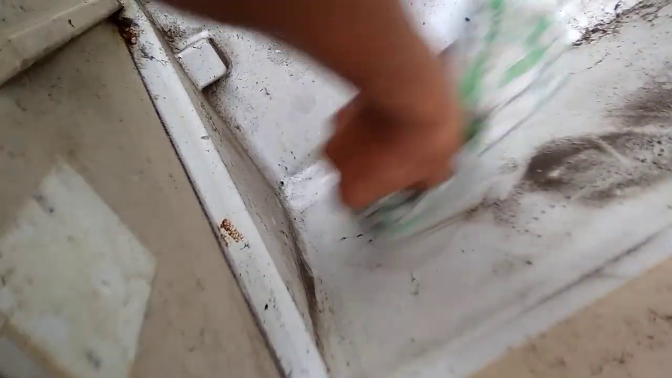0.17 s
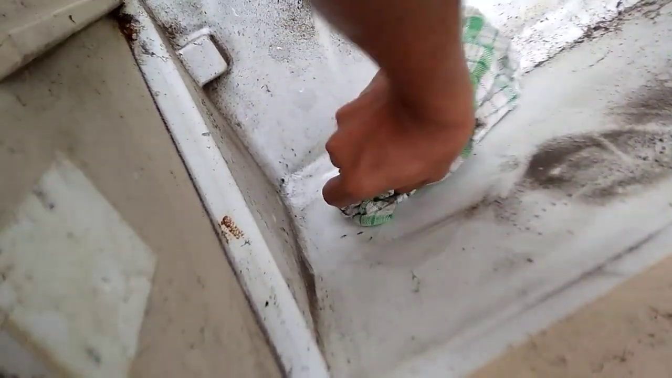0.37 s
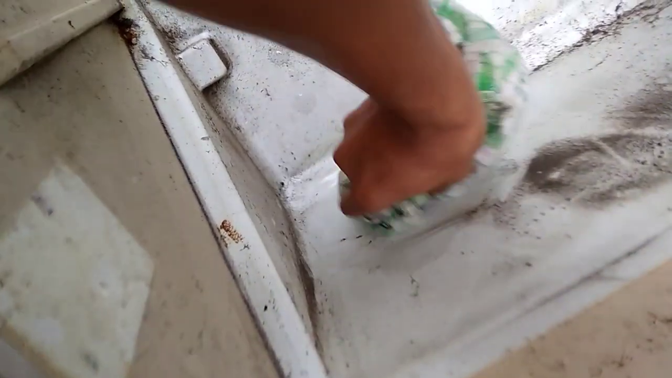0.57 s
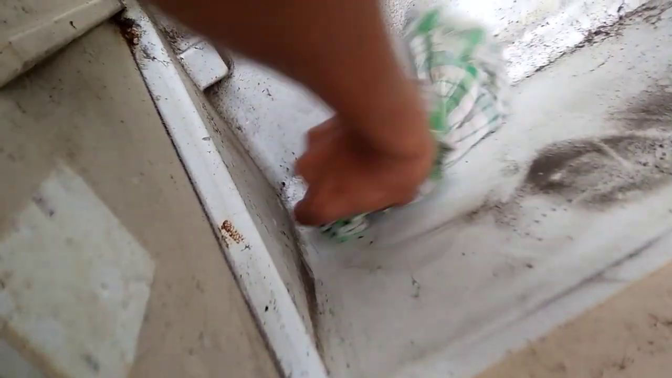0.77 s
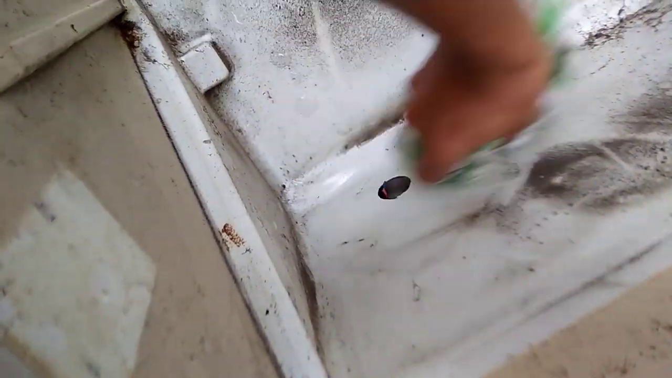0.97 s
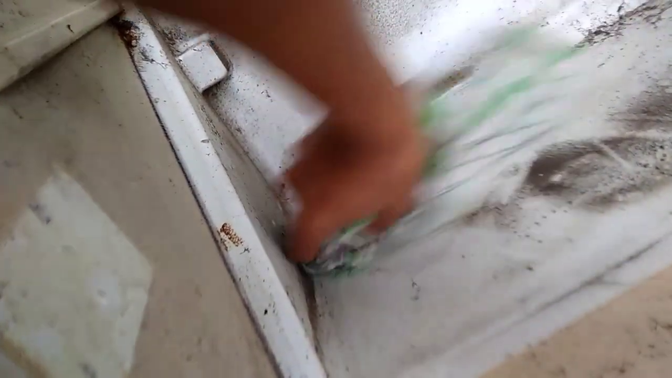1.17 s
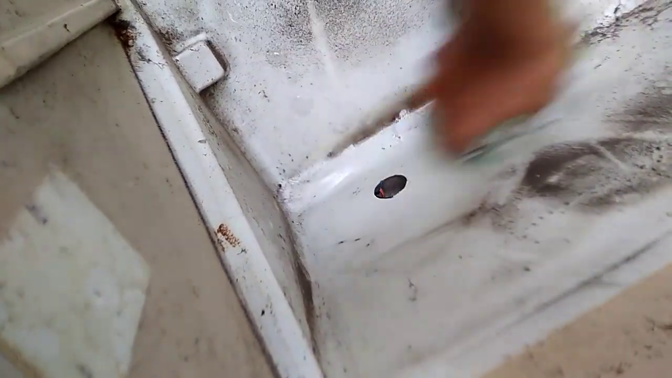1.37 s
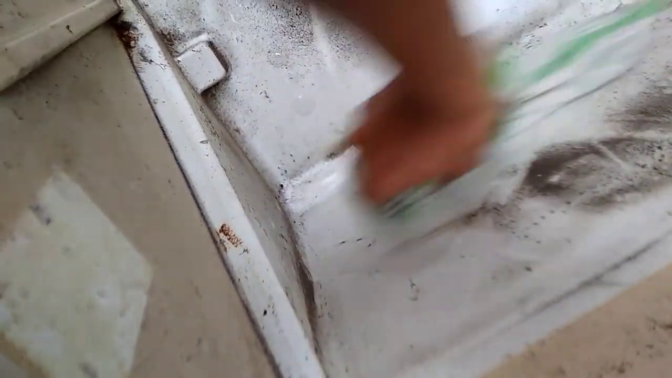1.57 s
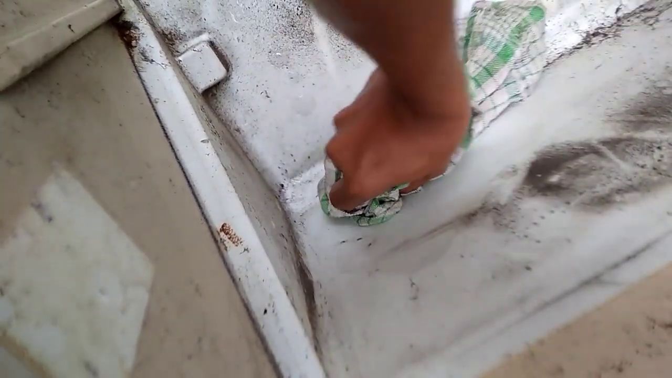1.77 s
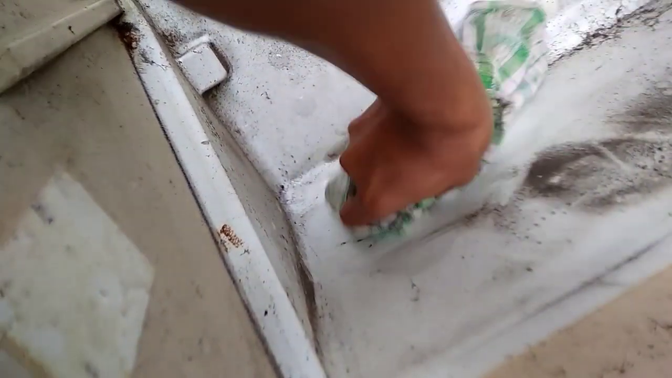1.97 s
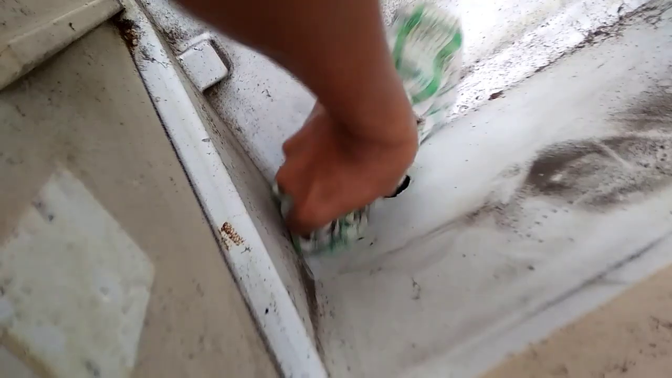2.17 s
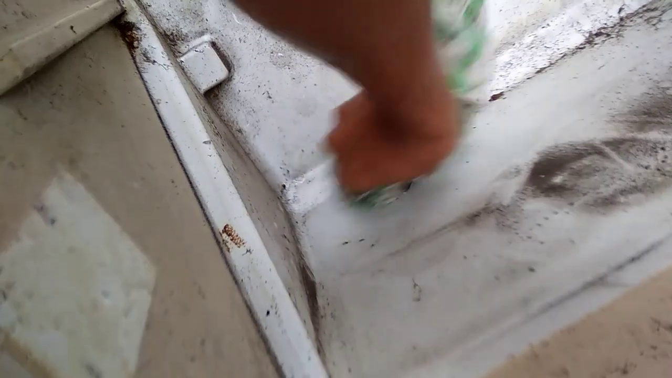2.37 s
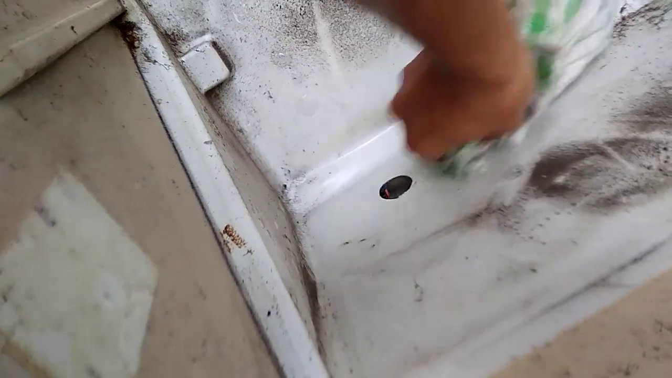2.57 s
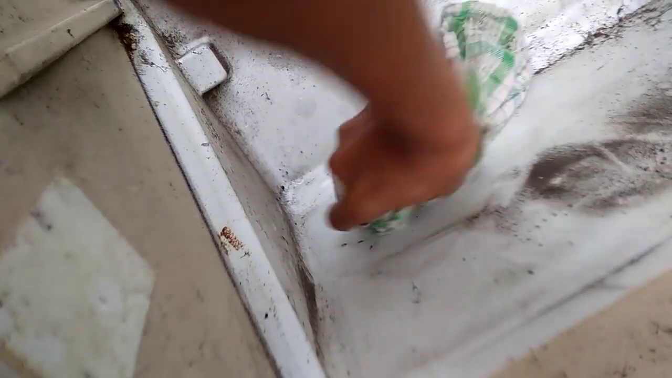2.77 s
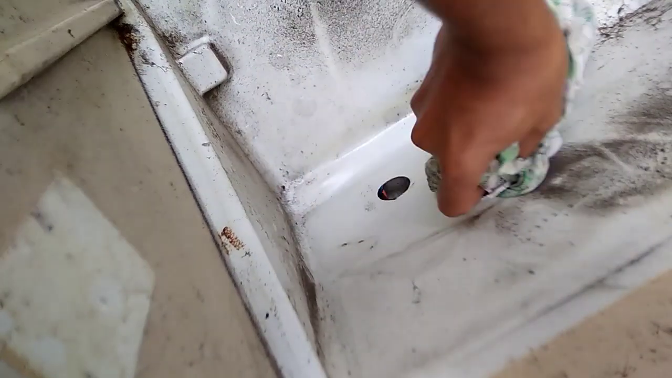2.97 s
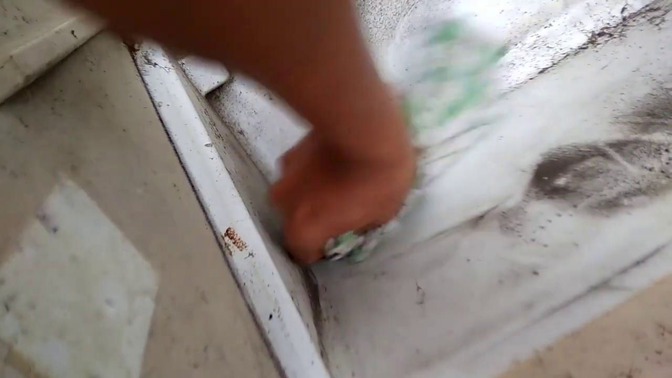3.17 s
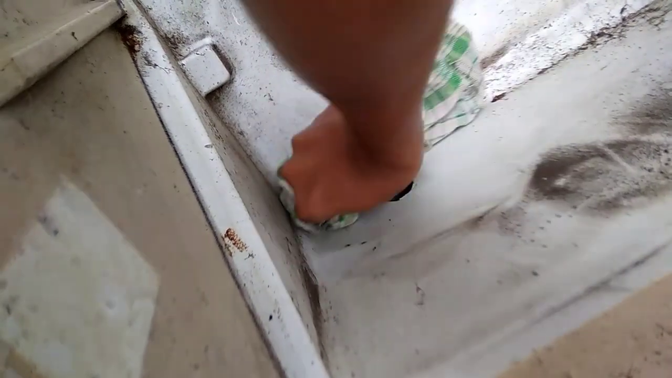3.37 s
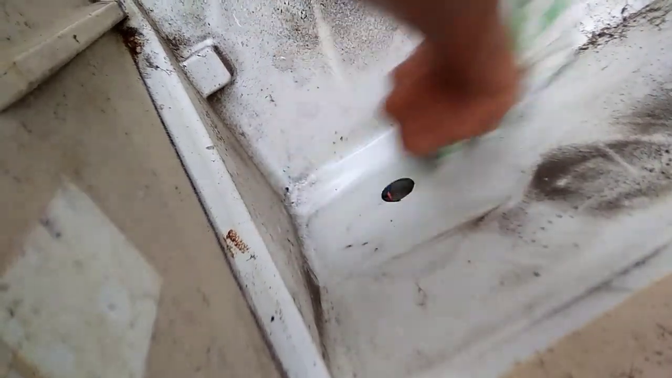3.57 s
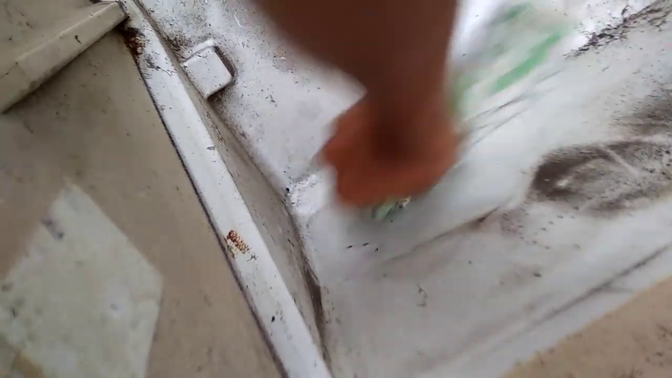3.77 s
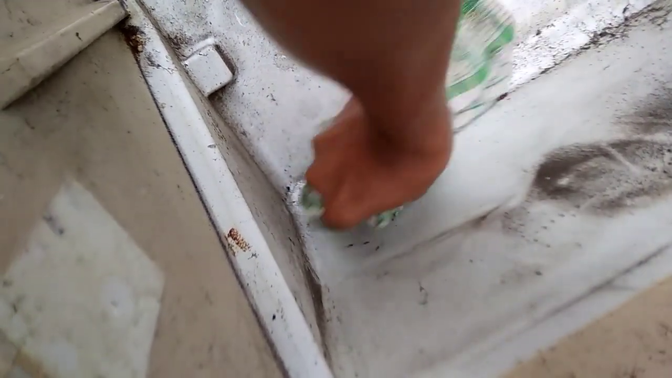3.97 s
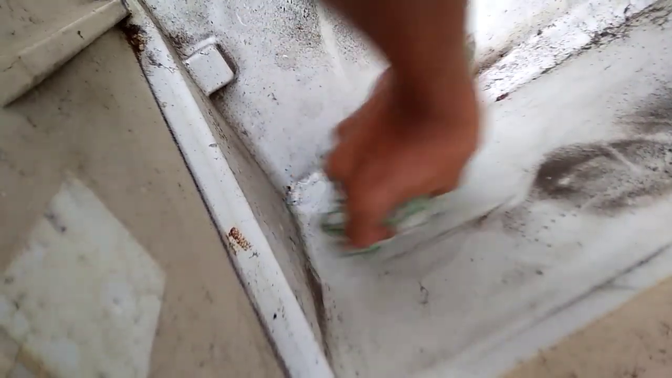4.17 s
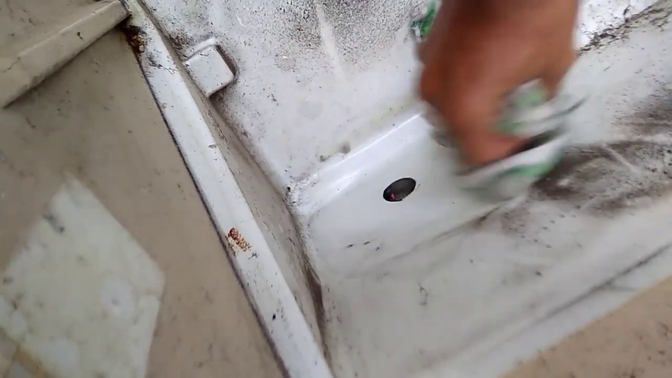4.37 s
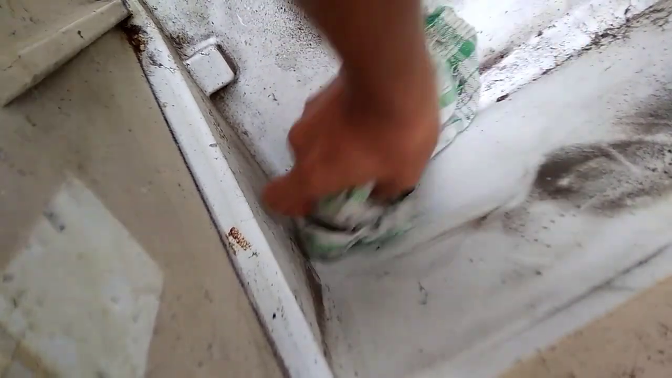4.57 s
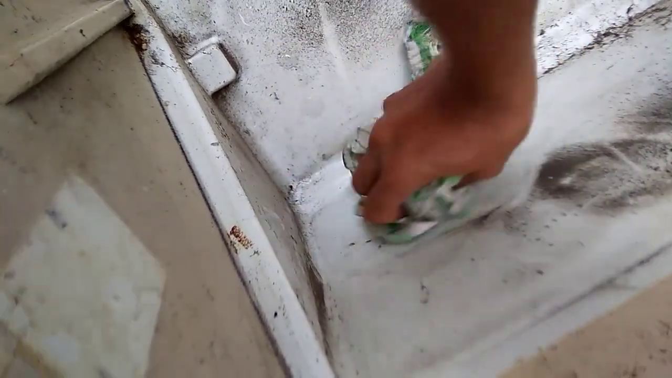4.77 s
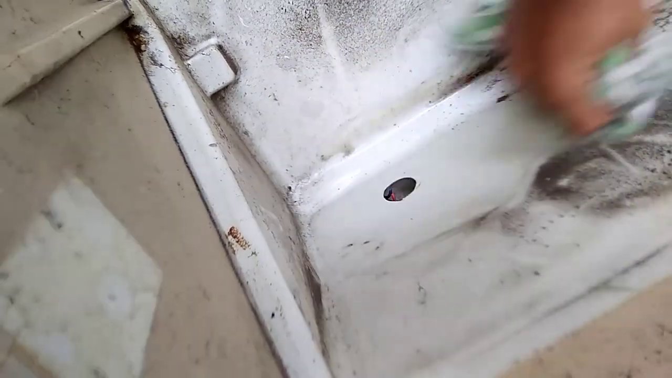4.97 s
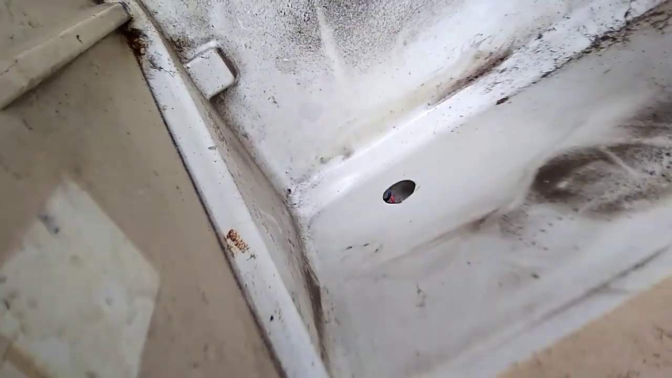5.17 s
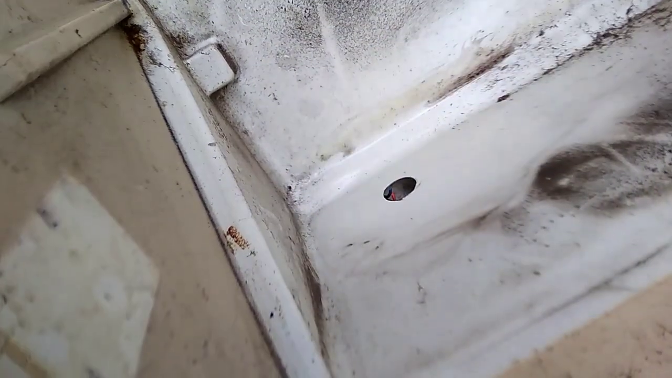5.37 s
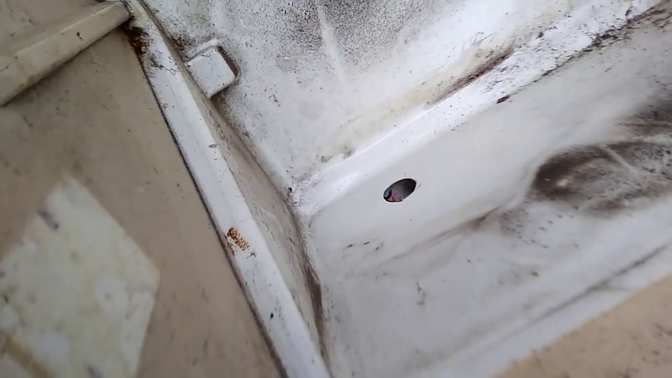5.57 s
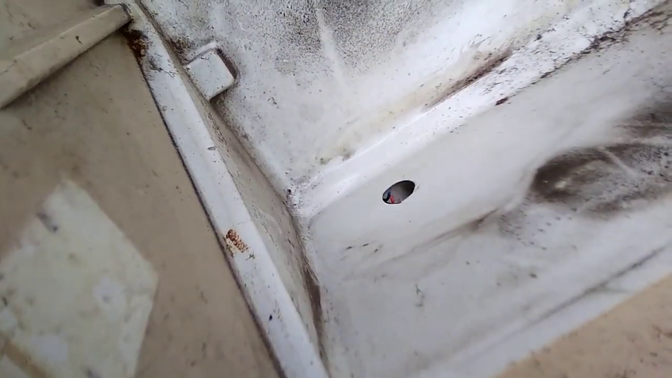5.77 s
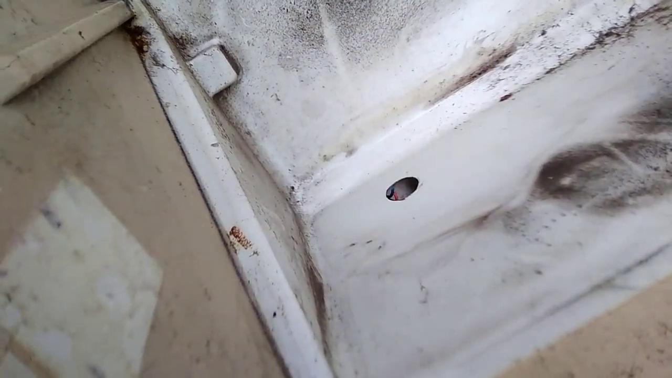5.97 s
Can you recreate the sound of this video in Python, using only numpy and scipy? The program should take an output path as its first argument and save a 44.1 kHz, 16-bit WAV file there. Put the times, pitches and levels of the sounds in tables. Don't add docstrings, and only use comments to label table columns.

```python
import sys
import numpy as np
from scipy import signal
from scipy.fft import rfft, irfft
from scipy.io import wavfile
from scipy.ndimage import uniform_filter1d, minimum_filter1d

SR = 44100
rng = np.random.default_rng(int(sys.argv[2]) if len(sys.argv) > 2 else 0)


def to_wav(sig):
    pcm = np.clip(np.atleast_2d(sig), -1, 1) * 32767
    pcm = np.round(pcm).astype(np.int16)
    wavfile.write(sys.argv[1], SR, pcm.T)


def rack_gain(trim_db):
    fader = np.asarray(trim_db, float)
    return 10 ** (fader / 20)


N = 265041

# time_s, level_db
EFFORT = [(0.0, -44), (0.2, -47.5), (0.33, -41.5), (0.63, -50), (0.73, -46.5), (1.5, -45), (1.83, -45.5),
          (2.26, -46.5), (2.46, -45.5), (2.7, -48), (3.02, -43), (3.45, -44.5), (4.0, -47.5), (5.08, -45.5),
          (5.4, -57), (5.54, -59.5), (5.6, -67), (6.01, -83.5)]
# stop_s, rest_ms, hiss_drop_db, slowing_ms, speeding_ms
TURNS = [(0.356, 4, 6.5, 59, 52), (0.525, 43, 16.5, 118, 60), (0.745, 18, 11, 10, 16),
         (1.02, 10, 5, 10, 46), (1.147, 15.2, 11.5, 18, 36), (1.332, 6, 10, 32, 38),
         (1.562, 18, 13, 12, 33), (1.785, 8.2, 12.5, 35, 29), (1.94, 55, 22, 99, 75), (2.252, 6, 8, 23, 13),
         (2.812, 20, 12.5, 25, 69), (3.055, 50, 19.5, 23, 32), (3.31, 10, 5, 25, 27), (3.41, 8, 5, 19, 60),
         (3.748, 8.9, 11, 16, 48), (3.93, 14, 6, 37, 35), (4.025, 8, 11, 53, 45),
         (4.48, 230, 14.5, 80, 6.6), (5.182, 15, 14.5, 79, 100), (5.322, 6, 13, 75, 3.7)]
# peak_s, level_db, rise_ms, fall_ms
PUSHES = [(0.095, -34, 79, 100), (0.15, -44.5, 68, 64), (0.27, -36.5, 37, 90), (0.315, -35, 50, 45),
          (0.4, -39, 63, 112), (0.704, -39.5, 96, 50), (0.84, -34.5, 69, 40), (0.894, -39, 28, 70),
          (0.984, -35.5, 93, 125), (1.06, -42, 75, 32), (1.28, -36.5, 56, 180), (1.44, -39.5, 80, 55),
          (1.47, -36.5, 47, 24), (4.32, -39.5, 69, 41), (4.975, -43.5, 41, 30), (1.83, -43.5, 39, 104),
          (2.03, -48.5, 26, 30), (2.068, -35.5, 17, 60), (2.195, -41, 17, 15), (2.13, -41, 136, 350),
          (2.35, -42.5, 32, 52), (2.45, -39.5, 21, 170), (2.52, -36, 150, 36), (2.924, -37.5, 75, 44.5),
          (3.22, -35.5, 39, 205), (3.386, -40.5, 20, 45), (3.61, -34.5, 100, 50), (3.646, -38, 27, 29),
          (4.26, -41, 25, 194), (4.864, -42, 181, 49), (4.934, -40, 74, 112), (5.07, -54, 110, 120),
          (5.4, -62, 18, 60)]
# peak_s, level_db, rise_ms, fall_ms
SCRAPES = [(1.462, -36.5, 117, 21), (1.708, -33, 34, 54), (2.755, -36, 31, 57), (3.868, -39, 47, 77),
           (4.134, -31.5, 55, 74), (4.36, -37, 67, 38), (5.265, -58, 46, 50), (4.04, -49.5, 150, 55)]
# start_s, peak_db, fade_ms
CATCHES = [(1.8218, -35, 3.8), (2.075, -29, 3.8), (2.273, -33, 5.3), (3.1158, -43, 8), (3.1283, -43, 8.7),
           (3.7663, -58, 6.5), (4.0776, -55, 5.8), (4.7127, -52, 8), (5.2679, -51, 9), (5.3328, -44.5, 5.7),
           (5.4016, -50, 6.2), (5.4495, -57, 21), (5.529, -53, 6.1)]
# frequency_hz, density_db (per Hz)
FIZZ = [(2350, -14.0), (4000, 1.5), (4840, -0.5), (5450, -3.5), (6410, 0.0), (6890, -2), (8390, 2.0),
        (10600, 3.5), (15300, 0.5)][:-1]
# frequency_hz, density_db (per Hz)
RASP = [(710, -44), (1200, -7), (1390, -15), (1750, -12), (1900, -5.5), (3060, -1), (7000, -11.5),
        (9100, -24), (15400, -120)]
# frequency_hz, width_hz, level_db
HOLLOW = [(185, 87, -5), (288, 164, -9), (400.5, 58, -2.5), (487.4, 24.7, -1), (648.6, 40, -0.5),
          (736.4, 15, -5), (881, 24.4, 0.5), (998, 46, 2), (1176, 47, -8), (1260, 22, -5),
          (1488, 330, -8.5), (1930, 1370, -11.5), (1130, 1750, -15), (602, 710, -11.5)]
# start_s, peak_db, contact_ms, airborne_snap_db, wall_ring_db
KNOCKS = [
    (1.2971, -4.5, 1.53, -35.5, -10),
    (2.2054, -5.5, 1.35, -35.5, -9),
    (3.2657, -10.5, 1.55, -53, -9),
    (4.6941, -18.5, 2.35, -64, -7),
]
# frequency_hz, level_db, t60_s
WALL = [(91, -17, 0.2), (117.9, 0, 0.21), (147, -7, 0.44), (181.7, -7.5, 0.29), (230.3, 1, 0.21),
        (264.5, -8, 0.16), (285, -13, 0.35), (352.7, 3.5, .14), (360, -14, 0.11), (422, 1.5, 0.27),
        (478.7, 11, 0.17), (520, 4, 0.16), (540, -9, 0.073), (652, 0, .07)]
# delay_ms, left_share, right_share
RETURNS = [(0, 1, 1), (3.18, 0.33, 0.23), (6.28, 0.41, 0.23), (9, 0.26, 0.17), (11.13, 0.83, 0.61),
           (15.57, .6, 0.62), (17.72, 0.6, 0.49), (26.32, 0.13, 0.18), (29.6, 0.29, 0.29), (36.4, .15, .15),
           (39.03, .15, 0.12)]
# start_s, peak_db, pitch_hz, t60_ms
BUMPS = [(1.2685, -28.5, 560, 50), (1.823, -32.5, 205, 104), (1.82, -41, 620, 45), (0.26, -38.5, 150, 380),
         (2.104, -36, 516, 34), (4.5, -49, 360, 60), (2.066, -28, 636, 28), (2.076, -32, 630, 30),
         (2.254, -16, 120, 120), (3.381, -27, 294, 37), (3.864, -33.5, 680, 42), (4.125, -33, 640, 34),
         (4.7, -36.5, 315, 64), (4.846, -35.5, 630, 65), (0.37, -29, 81, 127), (0.85, -35.5, 159, 280),
         (4.356, -26.5, 153, 81), (3.7, -36, 150, 56), (4.17, -35, 200, 60), (4.925, -35, 490, 180)]
# centre_s, peak_db, pitch_hz,
# length_ms
TICKS = [(4.164, -25, 1300, .6), (4.141, -30, 1200, 0.94), (4.372, -32, 1500, 1.6),
         (3.288, -36, 1450, 0.95), (2.7, -36, 2250, 1.2), (3.279, -34, 950, 2.2), (2.2095, -27, 1100, 1.1),
         (1.319, -38, 2000, 1.5), (2.077, -37, 1150, 1.5), (4.6, -40, 1500, 1.4), (4.856, -45, 1700, 1.0),
         (4.98, -42, 1100, .8), (1.3, -29, 940, 2), (1.435, -30, 700, 2.5), (2.277, -41, 2750, 1.5),
         (4.727, -39.5, 1610, 1.5)]
# time_s, pitch_hz, level_db
SQUEAKS = [
    [(5.5, 13500, -70), (5.52, 14800, -68)],
    [(5.535, 10300, -72), (5.57, 11600, -67), (5.603, 12500, -63), (5.614, 12050, -63), (5.63, 12350, -67),
     (5.67, 12500, -67), (5.69, 12300, -76)],
    [(5.58, 13400, -70), (5.61, 13700, -69), (5.67, 14800, -70)],
    [(5.69, 13200, -67), (5.708, 14100, -60), (5.72, 13500, -65), (5.74, 12800, -74)],
    [(5.74, 12300, -70), (5.762, 11700, -69), (5.782, 12800, -68), (5.82, 12150, -66), (5.845, 10900, -70)],
    [(5.79, 14900, -67), (5.81, 14500, -62), (5.832, 13400, -66)],
]
# time_s, level_db
WHISPER = [(5.56, -66), (5.69, -54), (5.758, -55.5), (5.822, -58), (5.9, -68), (6.01, -94)]
# frequency_hz, density_db (per Hz)
WHISPER_COLOUR = [(1000, -26), (1500, -12), (2600, -22), (6400, -42), (8200, -3.5), (9800, -13), (12000, 2),
                  (15000, 0)]
# time_s, level_db
FLEX = [(0.0, -45), (0.25, -45.5), (0.42, -54.5), (0.63, -48), (0.8, -43.5), (1.27, -45), (2.07, -47.5),
        (2.36, -40.5), (2.59, -50), (2.94, -45), (3.48, -47.5), (3.82, -48), (4.2, -45), (4.62, -51.5),
        (4.9, -45), (5.27, -48.5), (6.01, -50)]
# frequency_hz, density_db (per Hz)
RUMBLE = [(15, -34), (25, -26), (38, -15.5), (70, -17), (102, -2), (129, -18.5), (157, -9), (185, -17),
          (300, -36), (390, -53), (660, -120)]
# frequency_hz, density_db (per Hz)
ROOM = [(150, -11), (250, 3), (480, 1), (700, -12), (900, -10.5), (2400, -10), (3500, -24), (5000, -40),
        (15000, -43)]
# frequency_hz, likeness (0 to 1)
SAME = [(60, 0.95), (180, 1), (450, 0.65), (800, 0.76), (1200, 0.28), (1600, 0.68), (2300, 0.056),
        (5000, 0.021)]
# frequency_hz, level_db
LEFT_DB = [(60, 3.8), (150, 3.8), (350, 5.5), (480, 1), (700, -1), (1200, 3.5), (2400, 5), (4400, 4),
           (9000, .8), (15000, 1.2)]
# frequency_hz, threshold_db
GATE = [(1000, -16), (1600, -5), (2600, 1), (4000, 2.5), (7000, -.5), (9000, -2.5), (15000, -4)]
# frequency_hz, share (0 to 1)
DROPPED = [(800, 0), (1500, .012), (2600, .03), (3800, .15), (6000, .12), (8000, .13), (8600, .05),
           (14700, .05), (15300, .4)]

LAG_S = 0.00019


def hiss():
    effort_db, drop_db = over_time(EFFORT), slowed_db()
    sliding_db = effort_db - 0.44 * drop_db - 6.5
    rasp_gain = joined((1, sliding_db), (swells(PUSHES), -11.5), (swells(SCRAPES), -11.5))
    fizz = noise(FIZZ, size=256, patchy_db=1.0, flicker_db=0.5)
    rasp = noise(RASP, size=256, patchy_db=1.5, flicker_db=1.6)
    burst, t = np.zeros(N), np.arange(2000) / SR
    for start_s, peak_db, fade_ms in CATCHES:
        onset = 1 - np.exp(-t / 0.001)
        add(burst, start_s, rack_gain(peak_db + 4.5) * onset * np.exp(-t * 1000 / fade_ms))
    steady = rack_gain(effort_db - drop_db + 9.0) * fizz + rack_gain(5.0) * rasp_gain * rasp
    return steady + burst * (fizz + 0.167 * rasp)


def hollow():
    glide_db = over_time(EFFORT) - 0.29 * slowed_db() - 11
    pushes, scrapes = swells(PUSHES), swells(SCRAPES)
    lower = rack_gain(-1.5) * joined((1, glide_db), (pushes + scrapes, 0))
    upper = rack_gain(3.5) * joined((1, glide_db - 8), (pushes, -11.5), (scrapes, -9))
    slips = noise([(100, 0), (9000, 0)], size=256, patchy_db=2.5, flicker_db=2.8)
    grit = evened(rng.uniform(-1, 1, N) * (rng.random(N) < 700 / SR))
    slips = slips + rack_gain(-4) * np.array([np.roll(grit, round(LAG_S * SR)), grit])
    click = signal.unit_impulse(6000)
    split_hz = 950
    lower_modes = [mode for mode in HOLLOW if mode[0] < split_hz]
    upper_modes = [mode for mode in HOLLOW if mode[0] >= split_hz]
    out = 0
    for modes, gain in ((lower_modes, lower), (upper_modes, upper)):
        body = np.zeros(len(click))
        for k, (hz, width_hz, level_db) in enumerate(modes):
            body += (-1) ** k * rack_gain(level_db) * ring(click, hz, width_hz)
        body /= np.linalg.norm(body)
        out = out + signal.oaconvolve(gain * slips, body[None], axes=1)[:, :N]
    return out


def edge_returns():
    returns = np.zeros((2, 2500))
    for delay_ms, *shares in RETURNS:
        returns[:, round(delay_ms * SR / 1000)] = shares
    direct = returns[:, 0].copy()
    returns[:, 0] = 0
    returns = rack_gain(4) * ring(returns, 477, 340)
    returns[:, 0] = direct
    return returns


def wall_ring(t, u):
    spots = rng.standard_normal((len(WALL), 3))
    wall = np.zeros((2, len(t)))
    for (hz, level_db, t60_s), (shared, *apart) in zip(WALL, spots):
        differing = (hz / 450) ** 2 * np.array(apart)[:, None]
        mode_db = level_db + 2 * shared + 2 * differing - 60 * t / t60_s
        wall += rack_gain(mode_db) * np.sin(2 * np.pi * hz * t + 3 * shared + differing)
    build_up = 1 - np.exp(-(t / .022) ** 2)
    wall = signal.fftconvolve(wall * build_up, np.exp(-u ** 2 / 2)[None], axes=1)
    return wall / abs(wall).max()


def knocks():
    t, out = np.arange(15000) / SR, np.zeros((2, N))
    returns = edge_returns()
    for start_s, peak_db, contact_ms, snap_db, ring_db in KNOCKS:
        u = (t[:441] - .0043) * 3000 / contact_ms
        cycle = u * np.exp(.5 - u ** 2 / 2)
        thud = rack_gain(peak_db + ring_db) * wall_ring(t, u)
        add(thud, 0, rack_gain(peak_db) * signal.fftconvolve(returns, cycle[None], axes=1))
        bell = np.exp(-((t - .0025) / 0.00085) ** 2)
        snap = rack_gain(snap_db + 22.5) * np.sin(2 * np.pi * 1250 * t) * bell
        scatter = ring(rng.standard_normal((2, len(t))), 1050, 1300) * (1 - np.exp(-t / .003))
        snap = snap + rack_gain(snap_db + 19 - 60 * t / .09) * scatter
        add_ports(out, start_s, thud, lag_s=.0002)
        add_ports(out, start_s + .0097, snap)
    return out


def bumps():
    t, out = np.arange(12000) / SR, np.zeros((2, N))
    for start_s, peak_db, hz, t60_ms in BUMPS:
        tone = np.sin(2 * np.pi * hz * t) + 0.47 * np.sin(2 * np.pi * hz * 1.5 * t)
        decay = rack_gain(peak_db + 5.5 - 60000 * t / t60_ms)
        add_ports(out, start_s, -decay * tone * (1 - np.exp(-t * hz)))
    return out


def ticks():
    t, out = np.arange(-400, 400) / SR, np.zeros((2, N))
    for centre_s, peak_db, hz, length_ms in TICKS:
        bell = np.exp(-(t * 1000 / length_ms) ** 2)
        add_ports(out, centre_s + t[0], rack_gain(peak_db) * np.sin(2 * np.pi * hz * t) * bell)
    return out


def whisper():
    lifted_db = over_time([(5.42, -92), *WHISPER])
    return rack_gain(lifted_db + 3.5) * noise(WHISPER_COLOUR, size=256, patchy_db=2.5, flicker_db=.7)


def swish():
    centre_s, length_ms, hz, width_hz = 5.75, 70, 1500, 600
    passing = np.exp(-((np.arange(N) / SR - centre_s) * 1000 / length_ms) ** 2)
    air = ring(rng.standard_normal((2, N)), hz, width_hz)
    return rack_gain(-66.5) * passing * evened(ring(air, hz, 2 * width_hz))


def squeaks():
    out = np.zeros((2, N))
    port_phase = np.array([[0], [1.2]])
    for rows in SQUEAKS:
        s, hz, level_db = np.transpose(rows)
        t = np.arange(s[0], s[-1], 1 / SR)
        waver = evened(uniform_filter1d(rng.standard_normal(len(t)), size=150))
        turns = np.cumsum(np.interp(t, s, hz) + 70 * waver) / SR
        gain = rack_gain(np.interp(t, s, level_db) + 6 + 2 * waver) * signal.windows.tukey(len(t), .2)
        add(out, s[0], gain * np.sin(2 * np.pi * turns + port_phase))
    return out


def background():
    rumble = rack_gain(over_time(FLEX) + 1.5) * noise(RUMBLE, size=2048, patchy_db=1.5, flicker_db=.8)
    return rumble + rack_gain(-62) * noise(ROOM, size=1024, patchy_db=2.0, flicker_db=.6)


def slowed_db():
    ms, drop_db = np.arange(N) * 1000 / SR, np.zeros(N)
    for stop_s, rest_ms, depth_db, slowing_ms, speeding_ms in TURNS:
        corners_ms = stop_s * 1000 + np.cumsum([-slowing_ms, slowing_ms, rest_ms, speeding_ms])
        drop_db += np.interp(ms, corners_ms, [0, depth_db, depth_db, 0])
    return drop_db


def swells(rows):
    ms, power = np.arange(N) * 1000 / SR, np.zeros(N)
    for peak_s, level_db, rise_ms, fall_ms in rows:
        late_ms = ms - peak_s * 1000
        below = np.maximum(late_ms / fall_ms, -late_ms / rise_ms)
        power += rack_gain(2 * (level_db - 20 * below))
    return power


def joined(*parts):
    return np.sqrt(sum(power * rack_gain(2 * db) for power, db in parts))


def noise(colour, size, patchy_db, flicker_db):
    frames, hz = N * 4 // size + 5, np.fft.rfftfreq(size, 1 / SR)
    a, b, c, d, patches = rng.standard_normal((frames, len(hz), 5)).T
    patches = uniform_filter1d(patches, size=5, axis=0)
    patches = evened(uniform_filter1d(patches, size=12, axis=1))
    patches = 2 * np.tanh(patches / 2)
    flicker = evened(uniform_filter1d(rng.standard_normal(frames), size=4))
    same = np.clip(read(SAME, hz), 0, 1)[:, None]
    lag_s = LAG_S * np.clip(hz / 600, 0, 1)
    late = np.exp(-2j * np.pi * hz * lag_s)[:, None]
    right = a + 1j * b
    left = same * late * right + np.sqrt(1 - same ** 2) * (c + 1j * d)
    level_db = read(colour, hz)[:, None] + patchy_db * patches + flicker_db * flicker
    spectra = np.array([left, right]) * rack_gain(level_db)
    return evened(signal.istft(spectra, nperseg=size, noverlap=size * 3 // 4)[1][:, :N])


def ring(x, hz, width_hz):
    r = np.exp(-np.pi * width_hz / SR)
    return 2 * signal.lfilter([1 - r], [1, -r * np.exp(2j * np.pi * hz / SR)], x).real


def evened(x):
    return x / np.sqrt(np.mean(x ** 2) + 1e-20)


def read(points, hz):
    f, value = np.transpose(points)
    return np.interp(np.log(hz + 1), np.log(f + 1), value)


def over_time(points):
    s, value = np.transpose(points)
    return np.interp(np.arange(N) / SR, s, value)


def add(mix, s, sound):
    part = mix[..., round(s * SR):][..., :sound.shape[-1]]
    part += sound[..., :part.shape[-1]]


def add_ports(mix, s, sound, lag_s=LAG_S):
    left, right = np.broadcast_to(sound, (2, sound.shape[-1]))
    add(mix[1], s, right)
    add(mix[0], s + lag_s, left)


def scene():
    touching = hiss() + hollow() + knocks() + bumps() + ticks()
    leaving = whisper() + swish() + squeaks()
    return touching + leaving + background()


def gated(x):
    hz, t, z = signal.stft(x, SR, nperseg=2048, noverlap=1536)
    power = abs(z) ** 2 + 1e-20
    near = uniform_filter1d(uniform_filter1d(power, size=25, axis=1), size=3, axis=2)
    threshold = near * rack_gain(2 * read(GATE, hz))[:, None]
    kept = power ** 2 / (power ** 2 + threshold ** 2)
    band_bins = 11
    bands = rng.standard_normal((len(hz) // band_bins + 1, len(t)))
    bands = evened(uniform_filter1d(bands, size=5, axis=1))
    bands = minimum_filter1d(bands, size=3, axis=1)
    bands = np.repeat(bands, band_bins, axis=0)[:len(hz)]
    rank = 1 / (1 + np.exp(-1.7 * bands))
    faint = np.clip((-90 - 10 * np.log10(near.mean(0))) / 5, 0, 1.8)
    stays = rank > read(DROPPED, hz)[:, None] * (1 + faint)
    return signal.istft(z * kept * stays, SR, nperseg=2048, noverlap=1536)[1][:, :N]


def low_pass(x):
    return signal.sosfilt(signal.butter(12, 16570, fs=SR, output="sos"), x)


def record(dry):
    hz = np.fft.rfftfreq(N, 1 / SR)
    tilt_db = read(LEFT_DB, hz) / 2
    edge = np.clip((15600 - hz) / 100, 0, 1)
    ports = irfft(rfft(dry) * rack_gain(np.array([tilt_db, -tilt_db])) * edge, N)
    mix = gated(ports)
    return low_pass(mix)


dry = scene()
out = record(dry)
to_wav(out)
```